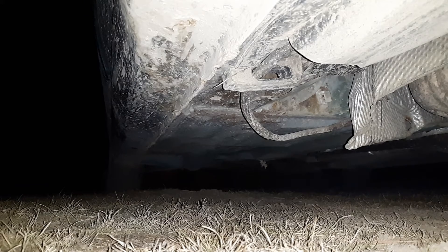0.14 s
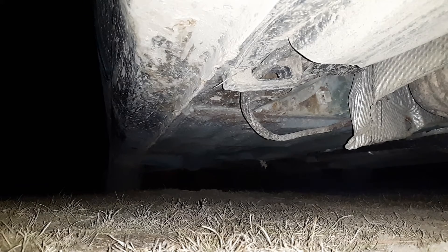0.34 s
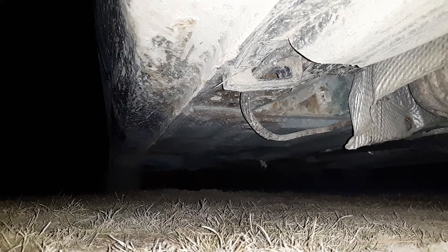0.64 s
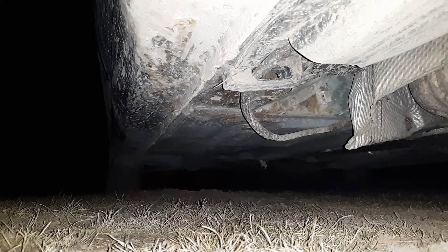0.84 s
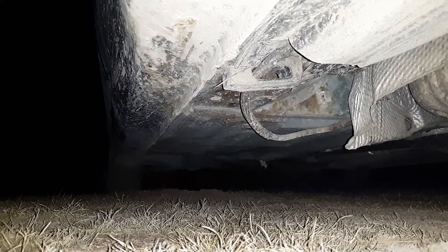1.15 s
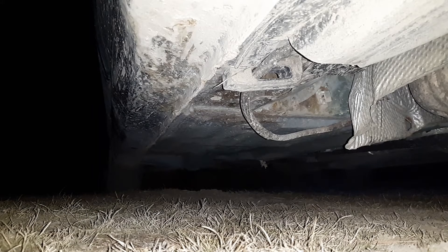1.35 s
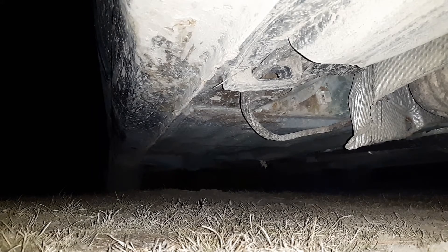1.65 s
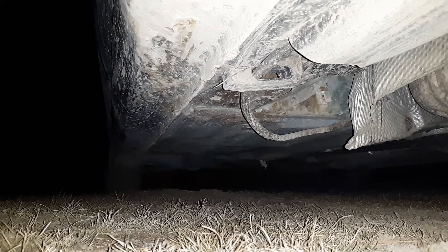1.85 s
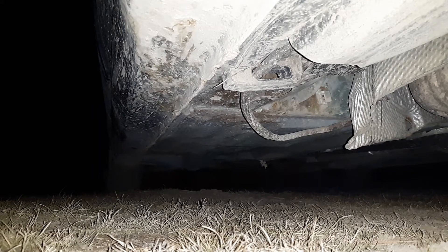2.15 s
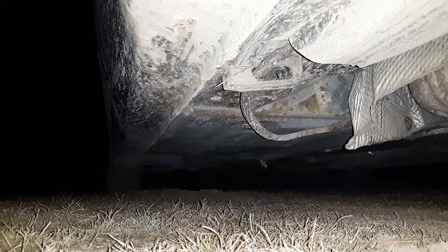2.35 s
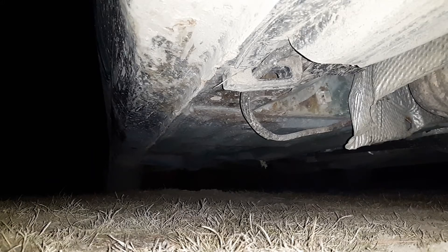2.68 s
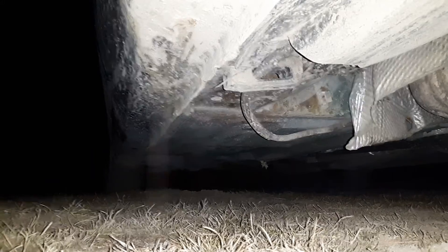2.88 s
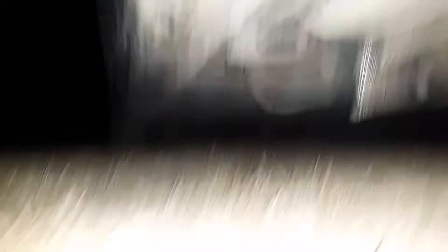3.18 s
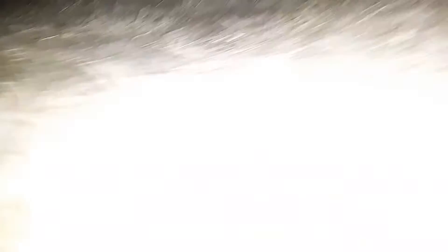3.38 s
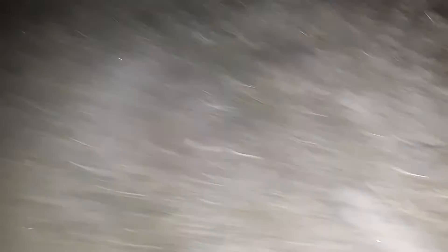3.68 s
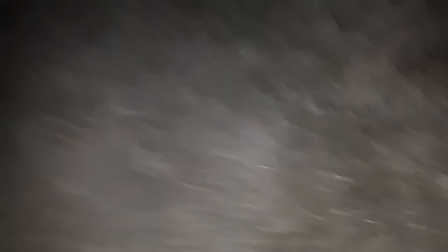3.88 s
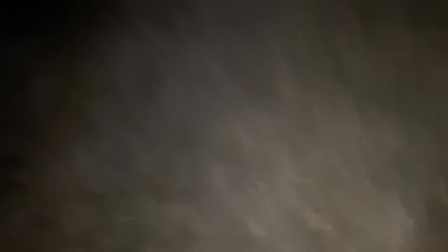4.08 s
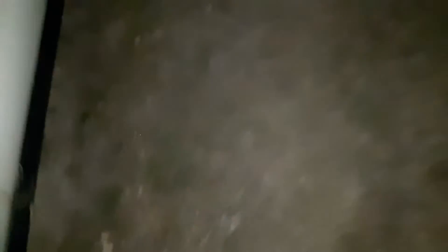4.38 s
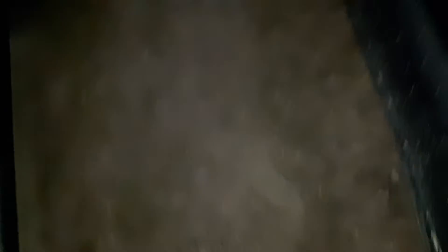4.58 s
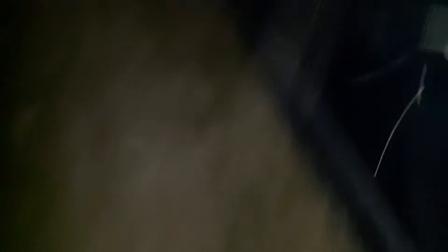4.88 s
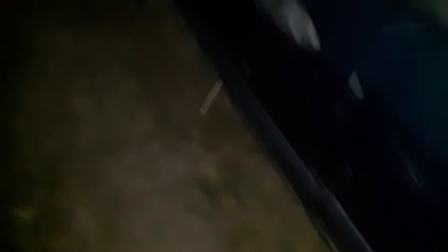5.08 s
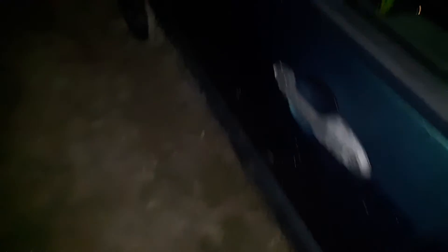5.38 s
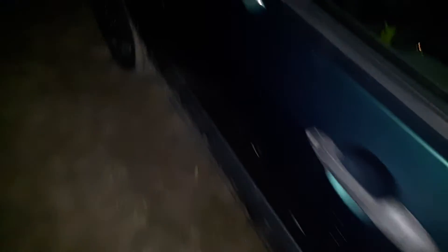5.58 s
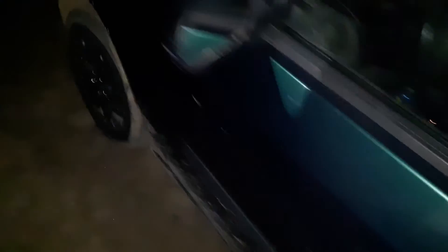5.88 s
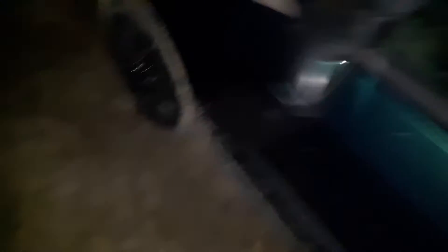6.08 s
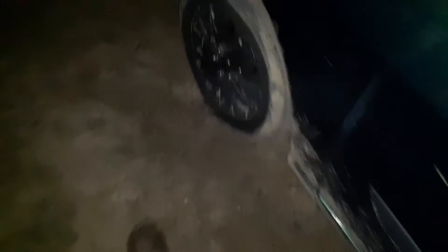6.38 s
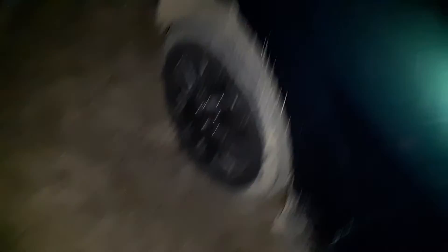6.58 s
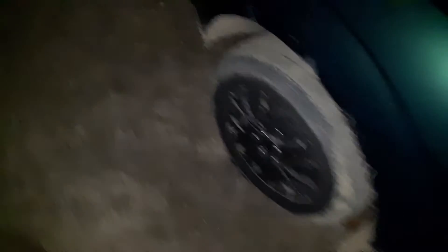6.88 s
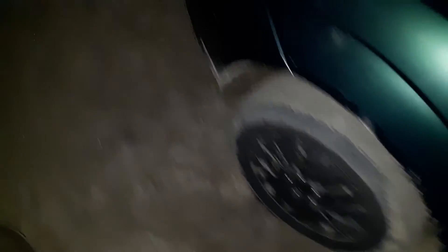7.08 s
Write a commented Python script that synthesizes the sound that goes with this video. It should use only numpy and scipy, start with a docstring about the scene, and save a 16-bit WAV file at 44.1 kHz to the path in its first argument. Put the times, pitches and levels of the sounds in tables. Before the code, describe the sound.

A four-cylinder car with no muffler idles outdoors, a loud, steady, rasping bark with the microphone right beside the open pipe. About halfway through, the microphone is picked up with a rustle and a few sharp taps, and the exhaust drops away and dulls. Near the front of the car, a low boom swells and loose metal shields knock and rattle, along with valve clatter, belt hiss and a faint whine.

```python
"""First you hear the bark and rasp of a four-cylinder car with no muffler, idling on grass.
Each firing sends a puff of gas out of the open pipe, close to a phone lying under the rear.
The phone is picked up with taps and a rustle and carried along the side to the front wheel.
There the bark gives way to the tinny knock of loose metal shields, a boom from under the floor,
and the clatter, hiss and whine of the valves and belts in the engine bay."""
import sys
import numpy as np
from scipy import signal
from scipy.fft import rfft, irfft, next_fast_len
from scipy.io import wavfile
from scipy.ndimage import uniform_filter1d, map_coordinates

SR = 44100
rng = np.random.default_rng(int(sys.argv[2]) if len(sys.argv) > 2 else 0)


def file_out(sig):
    """Save sig as 16-bit WAV at sys.argv[1]."""
    # one column per channel
    cols = np.atleast_2d(sig).T
    # limit, then scale
    lim = np.clip(cols, -1, 1)
    pcm = np.round(lim * 32767).astype(np.int16)
    wavfile.write(sys.argv[1], SR, pcm)


N = 319284
TIME = np.arange(N) / SR


def amp(db):
    """Turn decibels into a number to multiply by."""
    return 10 ** (np.asarray(db) / 20)


def unit(x):
    """Scale a sound to an average strength (rms) of 1."""
    return x / np.sqrt(np.mean(x ** 2) + 1e-20)


def along(points, hz):
    """Read a (frequency, value) table between its rows, on a log scale."""
    freqs, values = np.transpose(points)
    return np.interp(np.log(hz + 1), np.log(freqs + 1), values)


def curves(rows):
    """Join a table's rows over time: one curve for each column after the first."""
    times, *columns = np.transpose(rows)
    return [np.interp(TIME, times, column) for column in columns]


def wobble(rate):
    """A smooth curve through `rate` random values a second."""
    return map_coordinates(rng.standard_normal(int(N * rate / SR) + 4), [TIME * rate])


def filtered(x, response):
    """Multiply each frequency in x by response(hz)."""
    size = next_fast_len(N + SR // 2)
    return irfft(rfft(x, size) * response(np.fft.rfftfreq(size, 1 / SR)), size)[..., :N]


def lowpass(hz, edge_hz, order):
    """A gain that lets low sounds through and fades those above the edge."""
    return 1 / (1 + (hz / edge_hz) ** order)


def levelled(x):
    """Hold the strength at 1 over a few engine cycles."""
    power = uniform_filter1d(uniform_filter1d(x ** 2, SR // 10), SR // 10)
    return x / np.sqrt(np.abs(power) + 1e-12)


def bands(x, edges_hz):
    """Split a sound into equally strong bands, lowest first."""
    below = [filtered(x, lambda hz: lowpass(hz, edge, order=24)) for edge in edges_hz]
    return [levelled(band) for band in np.diff(below, axis=0, prepend=0)]


def panned(x, pan_db):
    """Make the left side pan_db louder than the right."""
    return x * amp(np.array([[.5], [-.5]]) * pan_db)


def impulses(times, sizes):
    """One spike per event, shared between neighbouring samples."""
    at = np.clip(times * SR, 0, N - 2)
    i = at.astype(int)
    return np.bincount(i, sizes * (1 - at + i), N) + np.bincount(i + 1, sizes * (at - i), N)


def puffs(times, cylinder_db, scatter_db, rise_s, decay_s):
    """A loudness curve that jumps and dies away at every firing."""
    sizes = amp(np.resize(cylinder_db, len(times)) + scatter_db * rng.standard_normal(len(times)))
    age = TIME[:SR // 10]
    shape = (1 - np.exp(-age / rise_s)) * np.exp(-age / decay_s)
    return unit(signal.fftconvolve(impulses(times, sizes), shape)[:N])


# How alike the left and right sides sound: (frequency [Hz], likeness [0 to 1])
LIKENESS = [(200, 0.14), (500, 0.91), (1000, 0.062), (2000, 0.38), (4000, 0.013), (12000, 0.02)]
def noise(colour):
    """Stereo noise; the colour table says how strong its frequencies are next to each other."""
    def response(hz):
        angle = np.arccos(np.clip(along(LIKENESS, hz), -1, 1)) / 2
        return amp(along(colour, hz)) * [np.cos(angle), np.sin(angle)]
    mid, side = filtered(rng.standard_normal((2, N)), response)
    return unit(np.array([mid + side, mid - side]))


def metal_ring(ring_hz, spread_hz, apart):
    """Thin metal rings at many close pitches; `apart` makes left and right differ."""
    common, differing = filtered(rng.standard_normal((2, 2, N)), lambda hz: lowpass(hz, spread_hz, 4))
    phase = 2 * np.pi * ring_hz * TIME
    ring = lambda sway: sway[0] * np.cos(phase) + sway[1] * np.sin(phase)
    return unit(ring(common) + apart * np.array([[1], [-1]]) * ring(differing))


# The slightly wandering idle: (time [s], speed [turns a minute])
IDLE_SPEED = [(0.0, 1238.4), (0.36, 1241.0), (0.61, 1190.3), (1.36, 1227.9), (1.71, 1203.0), (2.51, 1202.6),
              (2.57, 1189.3), (3.43, 1194.3), (3.55, 1211.1), (4.26, 1185.4), (5.01, 1194.8),
              (5.27, 1169.3), (6.02, 1211.6), (6.61, 1200.5), (6.79, 1173.0), (7.24, 1182.2)]
def crank():
    """The engine's shaft turns, with two firings a turn. Gives the turn count and firing times."""
    turns = .13 + np.cumsum(curves(IDLE_SPEED)[0]) / 60 / SR
    firings = np.interp(np.arange(int(2 * turns[-1]) + 1) / 2, turns, TIME)
    return turns, firings + .00007 * rng.standard_normal(len(firings))


def resound(times, sizes, notes):
    """Two pairs of cylinders take turns down separate branches, ringing the same notes unequally."""
    out = 0
    for pair in range(2):
        def response(hz):
            return sum((-1) ** k * amp(db[pair]) * 1j * hz * width / (pitch**2 - hz**2 + 1j * hz * width)
                       for k, (pitch, width, *db) in enumerate(notes))
        out = out + filtered(impulses(times[pair::2], sizes[pair::2]), response)
    return unit(out)


# Notes that ring in the pipe and under the floor:
# (pitch [Hz], width [Hz], first cylinder pair [dB], second pair [dB])
PIPE_NOTES = [(93, 142, -33.5, -31.5), (182.3, 45.4, -14.5, -19), (268.1, 14.5, -22.5, -14),
              (224.3, 59.5, -53, -22.5), (356.6, 23.7, -19, -22.5), (599.5, 14, -54, -40)]
FLOOR_NOTES = [(40.8, 3.7, -30.5, -34.5), (79, 31, -32, -31), (174.2, 25.05, 0, -3), (178.1, 34, -2, -5),
               (254.5, 33.2, -11.5, -32.5), (257.1, 29.2, -13.5, -76), (367.3, 14, -67.5, -33)]
def exhaust_pulses(firings, pipe_delay_s=0.003633):
    """Pressure pulses ring in the pipe and under the floor; each path carries a little of the other."""
    sizes = amp(0.7 * rng.standard_normal(len(firings)))
    pipe = resound(firings + pipe_delay_s, sizes, PIPE_NOTES)
    floor = resound(firings, sizes, FLOOR_NOTES)
    # a valve takes a moment to open, so the pulses are rounded
    pipe, floor = filtered(np.array([pipe, floor]), lambda hz: lowpass(hz, edge_hz=900, order=4))
    return pipe + 0.13 * floor, floor + 0.12 * pipe


# The phone leaves the pipe: (time [s], distance [m], left minus right [dB])
PHONE_PATH = [(0, 0.49, -4.5), (1.6, 0.49, -5), (3.45, 0.46, -5.5), (3.7, 0.69, -6.5), (4.0, 1.07, -5.5),
              (4.35, 2.25, -3), (5.2, 5.1, -2)]
def from_pipe(loss_db, lying_m=.5):
    """Sound from the rear loses loss_db each time the distance doubles."""
    distance_m = curves(PHONE_PATH)[0]
    return amp(-loss_db * np.log2(distance_m / lying_m))


# The bark, low to high: (top of band [Hz], level near the pipe [dB], loss per doubled distance [dB])
BARK_BANDS = [(100, -31, 6.5), (148.2, -23, 7.5), (303, -14, 10.5), (3000, -21, 11.5)]
def pipe_bark(pulses, idle_rpm=1229, db_per_rpm=0.0228):
    """The open pipe barks. Far off it is faint and dull, as deep sound bends round the car best."""
    parts = bands(pulses, [row[0] for row in BARK_BANDS])
    bark = sum(amp(db) * from_pipe(loss_db) * part for part, (_, db, loss_db) in zip(parts, BARK_BANDS))
    effort = amp(db_per_rpm * (curves(IDLE_SPEED)[0] - idle_rpm))  # faster is louder
    return panned(effort * bark, curves(PHONE_PATH)[1])


# Each cylinder's strength, in firing order: (shield knock [dB], pipe tick [dB], gas rush [dB])
CYLINDER_LEVELS = [(-4, 3, 13), (0, -3.5, 15.5), (-4.5, 4.5, 13.5), (-7, 4.5, 8.5)]
# The tone of rushing gas: (frequency [Hz], level [dB])
RUSH_COLOUR = [(250, -78.5), (430, -19), (600, -4.5), (730, -17), (1030, -14.5), (1120, -13.5), (1300, -13),
               (1780, -17), (2890, -22.5), (3370, -22), (4350, -29.5), (6550, -25.5), (7510, -38),
               (9280, -41), (16000, -59.5)]
# Notes of the ticking pipe wall: (pitch [Hz], spread [Hz], level [dB])
WALL_NOTES = [(1480, 65, -10.5), (1815, 110, -11), (2480, 130, -15), (3350, 300, -11.5), (6370, 580, -17)]
def pipe_rasp(firings, level_db=-34.5, rush_db=2, spit_db=-26, flutter_db=2, steady=2.7):
    """Each puff of gas makes the pipe wall tick and leaves with a crisp spit and a swirling rush."""
    _, tick_levels, rush_levels = np.transpose(CYLINDER_LEVELS)
    gusts = puffs(firings + .002, rush_levels, scatter_db=1.5, rise_s=.002, decay_s=.012)
    jolts = lambda: puffs(firings + .0015, tick_levels, scatter_db=2.5, rise_s=.001, decay_s=.003)
    rush = unit(steady + gusts) * noise(RUSH_COLOUR)
    ticks = sum(amp(db) * jolts() * metal_ring(hz, spread, apart=0.86) for hz, spread, db in WALL_NOTES)
    spit_colour = [(5000, -34.5), (7600, -2.5), (9300, 2.5), (11000, -14), (13000, -7),
                   (14000, -16), (16000, -30)]
    spit = unit(jolts() + gusts) * noise(spit_colour)
    flutter = noise([(20, -20), (90, -8.5), (180, -23.5), (380, 16), (430, -8), (800, -40), (3000, -86)])
    rasp = from_pipe(loss_db=5) * amp(rush_db) * rush
    rasp += from_pipe(loss_db=2) * amp(spit_db) * spit
    rasp += from_pipe(loss_db=9) * (ticks + amp(flutter_db) * flutter)
    return panned(amp(level_db) * rasp, pan_db=-4.5)


# The engine bay comes out from behind the car's body: (time [s], level [dB])
BAY_LEVEL = [(3.4, -48), (4.4, -30), (5.22, -22), (5.5, -7.5), (5.95, -3), (6.45, -1), (6.7, -1.5),
             (7.24, 1)]
def from_front(share=1):
    """The body blocks sound from the engine bay; some sounds feel only a share of this."""
    return amp(share * curves(BAY_LEVEL)[0])


# Fan, belt and alternator: (pitch [cycles per engine turn], rear level [dB], front level [dB])
BELT_TONES = [(19.98, -64.5, -42.5), (28.9, -56.5, -46.5), (29.85, -42, -49.5), (40.04, -55.5, -49.5),
              (57.26, -54.5, -50.5), (86.2, -59, -45), (88.9, -51, -62)]
# An electric pump: (pitch [Hz], rear level [dB], front level [dB])
PUMP_TONES = [(549.5, -53, -43), (1098.8, -48.5, -46), (2197.8, -57, -50)]
def whine(turns, rear_db=5, front_db=3, waver_db=1.8):
    """Belt-driven parts follow the engine's speed while the pump holds its pitch; all waver a little."""
    rear = amp(rear_db) * from_pipe(loss_db=8)
    front = amp(front_db) * from_front()
    out = 0
    for table, clock in ((BELT_TONES, turns), (PUMP_TONES, TIME)):
        for rate, at_rear_db, at_front_db in table:
            level = rear * amp(at_rear_db) + front * amp(at_front_db)
            tone = np.sqrt(2) * np.sin(2 * np.pi * rate * clock + .6 * wobble(40))
            out = out + panned(level * amp(waver_db * wobble(14)) * tone, pan_db=3 * wobble(0.88))
    return out


# Things brush past the phone: (time [s], length [s], level [dB], treble edge [Hz])
STROKES = [(3.29, 0.092, -30.5, 13400), (3.396, 0.16, -32, 16100), (3.68, 0.35, -45, 13100),
           (4.167, 0.64, -46.5, 8100), (4.428, 0.014, -37, 9050), (4.482, 0.057, -46, 8000),
           (4.555, 0.03, -41, 8560), (4.786, 0.022, -41.5, 11060), (5.015, 0.066, -42.5, 11400),
           (5.957, 0.031, -22.5, 8100), (6.78, 0.24, -33.5, 16000)]
# The tone of brushing: (frequency [Hz], level [dB])
STROKE_COLOUR = [(1200, -27), (3000, 0.5), (4500, 2.5), (6700, 3.5), (7600, -8), (11000, -7),
                 (16000, -18.5)]
def rustle(grain_db=2):
    """Hand, sleeve and grass rub near the microphones in grainy strokes that swell and fade."""
    grains = unit(amp(grain_db * wobble(830)) * noise(STROKE_COLOUR))
    out = 0
    for time, length, db, edge_hz in STROKES:
        swell = np.exp(-(2 * (TIME - time) / length) ** 2)
        out = out + amp(db) * filtered(swell * grains, lambda hz: lowpass(hz, edge_hz, order=5))
    return out


# Fingers land: (time [s], level over a millisecond [dB], left minus right [dB], treble edge [Hz])
FINGER_TAPS = [(3.4138, -17, 8.5, 14900), (3.448, -21, -9, 9050), (4.1289, -15.5, 19.5, 16300),
               (4.4572, -35.5, -20, 6000), (4.9323, -39, -10, 10000), (5.952, -24, 12, 7000),
               (5.9633, -19, 18, 7170)]
# The tone of the tapped case: (frequency [Hz], level [dB])
CASE_COLOUR = [(50, 2), (200, 5), (600, -4), (1500, -16), (3500, -4.5), (6800, -4), (8000, -18.5),
               (12000, -8.5), (16000, -21.5)]
def finger_taps():
    """Fingers hit the phone's case: each dry tap is a click with a tiny tail of noise."""
    out = 0
    for time, db, pan_db, edge_hz in FINGER_TAPS:
        age = np.maximum(TIME - time, 0)
        tail = .12 * rng.standard_normal(N) * (age > 0) * np.exp(-age / .0006)
        snap = impulses(np.array([time]), 1) + tail
        tap = filtered(snap, lambda hz: amp(along(CASE_COLOUR, hz)) * lowpass(hz, edge_hz, order=5))
        strength = np.sqrt(np.sum(tap ** 2) / (SR // 1000))
        out = out + panned(amp(db) * tap / strength, pan_db)
    return out


# The hardest knocks of the shields: (time [s], level [dB], pitch [Hz])
HARD_KNOCKS = [(3.7484, -27, 1640), (3.8977, -29, 1280), (4.5032, -34, 1560), (4.881, -38, 1550),
               (4.9062, -33, 1550), (5.4175, -28, 1324), (5.9673, -17, 1400), (5.9904, -18, 1420),
               (6.0137, -17, 1420), (6.115, -13.5, 1440), (6.191, -23, 1390), (6.2123, -20, 1460),
               (6.2653, -17, 1410), (6.315, -11, 1380), (6.364, -18, 1260), (6.4379, -21, 1270),
               (6.613, -17.5, 1220)]
def shield_clanks(gain_db=-1, rise_s=0.0022, rough=0.34, apart=0.58):
    """Now and then a loose metal shield strikes hard: a short, rough ring."""
    smear = rough * wobble(450) + apart * np.array([wobble(300), wobble(300)])
    out = 0
    for time, db, hz in HARD_KNOCKS:
        age = np.maximum(TIME - time, 0)
        strike = age / rise_s * np.exp(1 - age / rise_s)
        out = out + amp(db + gain_db) * strike * np.sin(2 * np.pi * hz * age + smear)
    return out


# Loose shields along the way: (time of passing [s], level [dB], pitch [Hz])
LOOSE_SHIELDS = [(3.82, -44, 1340), (4.8, -47, 1594), (5.45, -45.5, 1462), (6.1, -27.5, 1428),
                 (6.5, -32.5, 1266)]
def shield_rattle(firings, gap_m=0.2, walk_m_per_s=0.9, falloff=2.28):
    """Every firing jolts thin metal sheets into a brief ring, each loudest as the phone passes it."""
    knock_levels = np.transpose(CYLINDER_LEVELS)[0]
    jolts = puffs(firings + .003, knock_levels, scatter_db=2, rise_s=.001, decay_s=.005)
    rings = 0
    for time, db, hz in LOOSE_SHIELDS:
        nearness = gap_m / np.hypot(gap_m, walk_m_per_s * (TIME - time))
        rings = rings + amp(db) * nearness ** falloff * metal_ring(hz, spread_hz=90, apart=0.95)
    return jolts * rings


# Two booms under the floor: (time [s], lower boom [dB], upper boom [dB])
BOOM_LEVELS = [(4.25, -28.5, -45), (4.6, -32.5, -37), (5.22, -33.5, -34.5), (5.42, -22.5, -26.5),
               (5.75, -17, -21.5), (6.5, -17, -13.5), (6.75, -18.5, -16), (7.2, -22.5, -25)]
def floor_boom(pulses, start_s=3.8, fade_s=0.66):
    """The phone moves through two standing waves, booms that are loud in some spots and weak in others."""
    thud, lower, upper, growl, buzz = bands(pulses, edges_hz=[100, 180, 225, 300, 3000])
    lower_db, upper_db = curves(BOOM_LEVELS)
    lifted = np.clip((TIME - start_s) / fade_s, 0, 1)  # the booms come in as the phone rises
    boom = lifted * (amp(lower_db) * lower + amp(upper_db) * upper)
    # thud, growl and buzz grow towards the engine
    boom += amp(-27.5) * from_front(share=0.71) * thud
    boom += amp(-21) * from_front() * growl
    boom += amp(-34) * from_front(share=0.61) * buzz
    return panned(boom, pan_db=-0.7)


# The tone of the valves, and of the belts and air intake: (frequency [Hz], level [dB])
VALVE_COLOUR = [(60, -44), (150, 9.5), (300, 3.5), (550, -6.5), (950, -4), (1200, -0.5), (2200, -3.5),
                (3000, -12), (5000, -58.5), (10000, -59)]
BELT_COLOUR = [(1500, -29.5), (3000, 1), (5200, -3.5), (6600, 1.5), (7400, -11), (9000, -12.5),
               (12000, -25.5), (16000, -36)]
# The hiss grows as the belts come into view behind the front wheel: (time [s], level [dB])
HISS_LEVEL = [(4.2, -63), (5.22, -52), (5.5, -43), (5.9, -39), (6.43, -34.5), (6.95, -33.5), (7.24, -30)]
def engine_bay(firings, clatter_db=-25, steady=1.6):
    """Valves clatter while the belts and air intake hiss, all pulsing with the firings."""
    beat = unit(steady + puffs(firings + .0026, [0], scatter_db=5.5, rise_s=.001, decay_s=.028))
    clatter = amp(clatter_db) * from_front() * noise(VALVE_COLOUR)
    hiss = amp(curves(HISS_LEVEL)[0]) * noise(BELT_COLOUR)
    return beat * (clatter + hiss)


def scene():
    """The turning engine sets the beat for the car; handling the phone adds rustles and taps."""
    turns, firings = crank()
    pipe, floor = exhaust_pulses(firings)
    return (pipe_bark(pipe) + pipe_rasp(firings) + whine(turns) + rustle() + finger_taps()
            + shield_clanks() + shield_rattle(firings) + floor_boom(floor) + engine_bay(firings))


def record(dry, top_hz=16300):
    """The phone rounds off the highest peaks and keeps nothing above top_hz."""
    rounded = dry / (1 + np.abs(dry) ** 10) ** (1 / 10)
    return filtered(rounded, lambda hz: hz < top_hz)


dry = scene()
out = record(dry)
file_out(out)
```